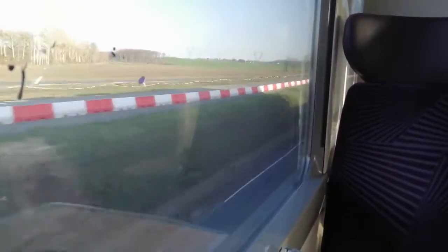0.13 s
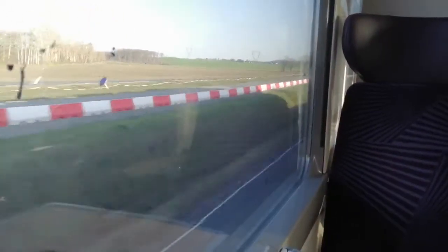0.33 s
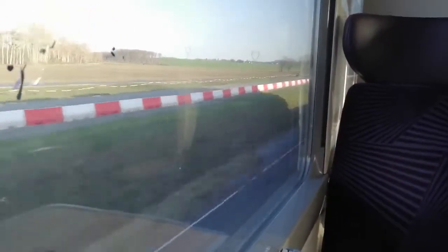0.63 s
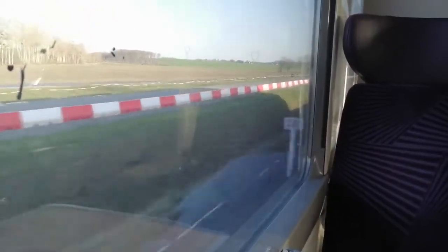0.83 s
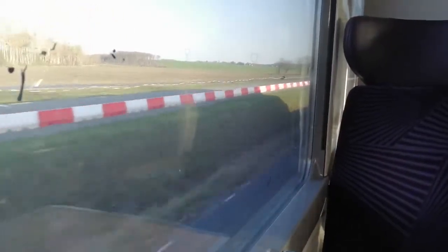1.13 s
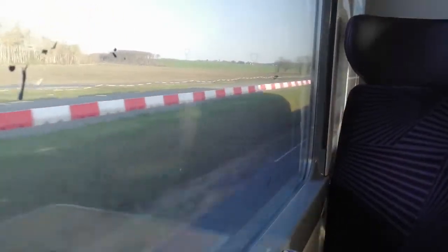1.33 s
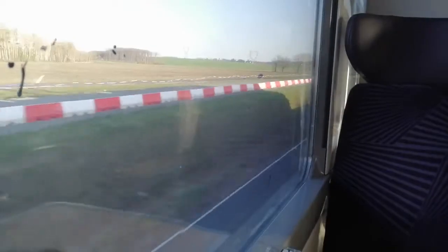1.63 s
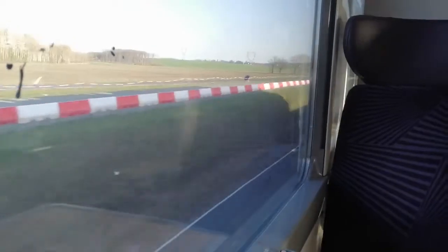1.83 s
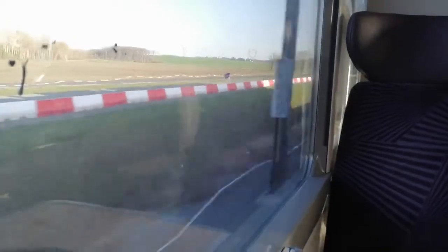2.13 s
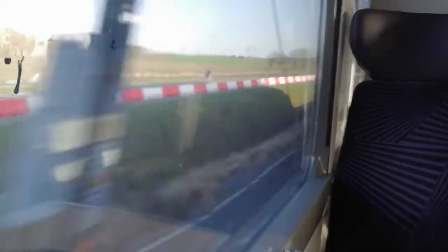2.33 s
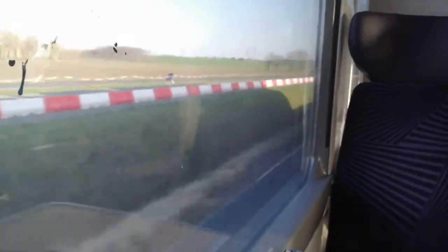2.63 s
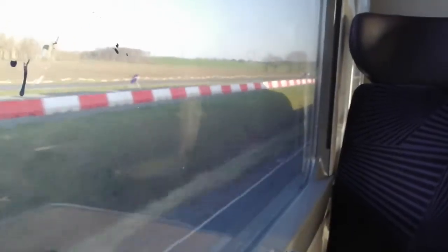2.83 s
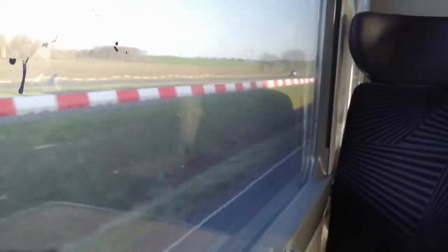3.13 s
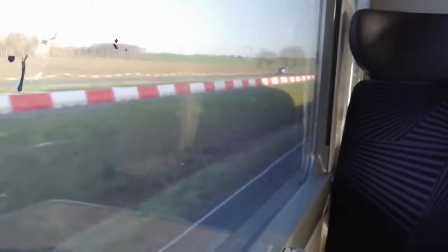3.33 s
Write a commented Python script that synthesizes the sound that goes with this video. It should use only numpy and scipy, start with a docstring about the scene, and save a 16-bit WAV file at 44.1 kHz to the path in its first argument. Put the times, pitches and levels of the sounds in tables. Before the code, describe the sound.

A passenger train runs at steady speed, heard from a window seat inside the coach. Deep floor rumble and a hollow, wavering body resonance continue throughout, with a low electrical hum, thin buzz and faint window hiss. Soft, dull track thuds swell at about 0.3 and 1.7 seconds. A short, faint air puff passes at 2.4, and a barely audible knock follows at 2.7. The treble is muted.

```python
"""Inside a passenger coach running at steady speed. Wheels rumble through the floor and ring the body:
coloured noise with randomly shaken resonances. The electrical supply hums and buzzes in wavering sines,
and air hisses along the window as patchy noise. Two soft thuds of swelling modes come up from the track,
a trackside mast sweeps past with a short puff of noise, and one faint knock sounds in the coach."""
import sys
import numpy as np
from scipy import signal
from scipy.fft import rfft, irfft
from scipy.io import wavfile
from scipy.ndimage import uniform_filter1d

SR = 44100
rng = np.random.default_rng(int(sys.argv[2]) if len(sys.argv) > 2 else 0)


def inscribe(sig):
    """Save sig as 16-bit PCM at rate SR to the path in sys.argv[1].

    A 1-D sig is mono; a 2-D sig holds one channel per row.
    Samples are clipped to [-1, 1] before scaling.
    """
    pcm = np.round(np.clip(np.atleast_2d(sig).T, -1, 1) * 32767)
    wavfile.write(sys.argv[1], SR, pcm.astype(np.int16))


N = 154350  # samples, 3.5 s


def amp(db):
    """Turns dB into a gain."""
    return 10 ** (np.asarray(db) / 20)


def unit(x):
    """Scales to rms 1."""
    return x / np.sqrt(np.mean(x ** 2) + 1e-20)


def read_spectrum(points, hz):
    """Joins spectrum points on a log-frequency axis."""
    point_hz, db = np.transpose(points)
    return np.interp(np.log(hz + 1), np.log(point_hz), db)


def curve(points):
    """Joins points in time by straight lines."""
    return np.interp(np.arange(N) / SR, *np.transpose(points))


def drift(rate_hz):
    """Slow random motion of rms 1: noise kept below about rate_hz, without its mean."""
    hz = np.fft.rfftfreq(N, 1 / SR)
    slow = np.exp(-(hz / rate_hz) ** 2) * (hz > 0)
    return unit(irfft(rfft(rng.standard_normal(N)) * slow, N))


def noise(spectrum, patchy_db, swell_db, size):
    """Coloured noise of rms 1 with drifting patches in time and pitch, and a swell shared by all pitches."""
    hz = np.fft.rfftfreq(N, 1 / SR)
    grid = signal.stft(rng.standard_normal(N), nperseg=size)[2]
    patches = uniform_filter1d(rng.standard_normal(grid.shape), size=7, axis=0)
    patches = unit(uniform_filter1d(patches, size=7, axis=1))
    white = signal.istft(grid * amp(patchy_db * patches), nperseg=size)[1][:N]
    coloured = irfft(rfft(white) * amp(read_spectrum(spectrum, hz)), N)
    return unit(coloured * amp(swell_db * drift(2.8)))


WANDER, WANDER_HZ = 0.00797, 3  # rms pitch wander as a fraction of the centre, and its rate
EVENNESS = 0.36  # 0 leaves the strength fully random, 1 makes it constant


def ringing(centre_hz, width_hz):
    """A resonance shaken at random but without rest, so its strength is fairly even; its pitch wanders. Rms 1."""
    hz = np.fft.fftfreq(N, 1 / SR)
    resonance = 1 / (1 + 1j * hz / width_hz * np.sqrt(2)) ** 2  # centred on 0 Hz, moved up below
    shake = np.fft.ifft(np.fft.fft(rng.standard_normal(N)) * resonance)
    even_shake = shake / abs(shake) ** EVENNESS
    turns = np.cumsum(centre_hz * (1 + WANDER * drift(WANDER_HZ))) / SR
    return unit((even_shake * np.exp(2j * np.pi * turns)).real)


def burst(start, rise, hold, t60):
    """Linear attack, hold and exponential release that falls 60 dB in t60 seconds."""
    t = np.arange(N) / SR - start
    release = np.exp(-np.log(1000) * np.maximum(t - rise - hold, 0) / t60)
    return np.clip(t / rise, 0, 1) * release


# Colour of the rolling rumble. Each row: frequency in Hz, relative level in dB per Hz.
RUMBLE_SPECTRUM = [(5, -27.5), (16, 3), (40, -2.5), (60, 2), (88, 0.5), (120, -3), (152, -2.5), (195, -7.5),
                   (225, -11.5), (300, -16.5), (420, -22), (540, -24.5), (690, -27.5), (980, -26),
                   (1300, -34), (1700, -43), (3500, -64)]
RUMBLE_DB, RUMBLE_PATCHY_DB, RUMBLE_SWELL_DB = -42, 0.32, 0.08
# Resonances of the floor. Each row: frequency in Hz, width in Hz, level in dB.
FLOOR_RESONANCES = [(37.1, 9, -56.5), (56, 10, -51), (153.6, 24, -53)]
# Resonances of wheels and coach body. Each row: frequency in Hz, width in Hz, level in dB.
BODY_RESONANCES = [(285.4, 5.5, -60.5), (335.2, 13.2, -54), (356.3, 28, -57.3), (384.7, 20, -58),
                   (444.2, 14, -65), (469, 12, -64.5), (492.6, 12, -68)]
# Level ride of the floor rumble. Each row: time in seconds, gain in dB.
FLOOR_RIDE = [(0, 1.5), (.13, .7), (.28, -0.5), (.55, 0.5), (.7, 0.4), (.93, -0.3), (1.38, 0.3), (1.55, 0),
              (1.95, 1), (2.1, -1), (2.23, 1.5), (2.44, -2), (2.68, -0.1), (2.96, 0.5), (3.06, 0.5),
              (3.23, 2), (3.37, -0.5), (3.5, 2)]
# Level ride of the body's ringing. Each row: time in seconds, gain in dB.
BODY_RIDE = [(0, -2.5), (.42, 1), (.75, 0.5), (.95, 0), (1.3, -1), (1.53, 0), (1.65, -0.5), (1.89, -2),
             (2.06, 1.5), (2.35, 0), (2.64, 3), (2.95, -1), (3.17, -0.5), (3.4, -5), (3.5, -6)]


def rolling():
    """Rough rails shake the floor and the resonances of the body, by changing amounts."""
    rumble = amp(RUMBLE_DB) * noise(RUMBLE_SPECTRUM, RUMBLE_PATCHY_DB, RUMBLE_SWELL_DB, size=1024)
    boom = sum(amp(db) * ringing(hz, width) for hz, width, db in FLOOR_RESONANCES)
    body = sum(amp(db) * ringing(hz, width) for hz, width, db in BODY_RESONANCES)
    return amp(curve(FLOOR_RIDE)) * (rumble + boom) + amp(curve(BODY_RIDE)) * body


# Harmonics of the electrical hum. Each row: multiple of HUM_HZ, rms level in dB.
HUM_LINES = [(1, -47), (6, -75.5), (8, -77), (9, -71.5), (10, -77.5), (12, -77.5), (13, -78.5), (20, -82),
             (21, -76), (22, -86.5), (23, -82), (24, -88.5), (25, -76.5), (26, -80), (30, -76.5),
             (31, -81.5), (32, -83.5), (34, -83.5)]
# Thin top of the buzz. Each row: multiple of HUM_HZ, rms level in dB.
BUZZ_LINES = [(40, -90.5), (63, -86.5), (72, -93)]
HUM_HZ = 100.06
HUM_WAVER_DB, HUM_WAVER_RAD, HUM_WAVER_HZ = 2.13, 0.044, 3.4  # rms in level, rms in phase, rate


def hum():
    """Harmonics of the supply, each wavering a little as the coach sways."""
    turns = HUM_HZ * np.arange(N) / SR
    out = np.zeros(N)
    for multiple, db in list(HUM_LINES) + list(BUZZ_LINES):
        phase = 2 * np.pi * (round(multiple) * turns + rng.random())
        phase = phase + HUM_WAVER_RAD * drift(HUM_WAVER_HZ)
        waver = amp(HUM_WAVER_DB * drift(HUM_WAVER_HZ))
        out += amp(db) * unit(waver * np.sin(phase))
    return out


# Colour of the air along the window. Each row: frequency in Hz, relative level in dB per Hz.
HISS_SPECTRUM = [(500, -12.5), (1400, -5), (1800, -3.5), (2600, 0), (3150, -3), (3700, -9), (4200, -10.5),
                 (4800, -7), (5350, -2.5), (6200, -5), (6850, -9), (7200, -14), (7550, -24)]
# Level ride of the hiss. Each row: time in seconds, gain in dB.
HISS_RIDE = [(0, -0.5), (.26, -1.2), (.43, 1.5), (.62, 0.2), (1.0, -.5), (1.52, 0.7), (1.86, -1),
             (1.97, -0.2), (2.14, -1), (2.21, -3), (2.36, -0.5), (2.52, -1.1), (3.5, -0.5)]
HISS_DB = -62.5
AIR_PATCHY_DB, AIR_SWELL_DB = 0.7, 0.3  # shared by hiss and puff


def hiss():
    """Air along the window: patchy noise whose level shifts a little and sags just before the mast."""
    air = noise(HISS_SPECTRUM, AIR_PATCHY_DB, AIR_SWELL_DB, size=512)
    return amp(HISS_DB + curve(HISS_RIDE)) * air


# Thuds from the track. Each row: start in seconds, level in dB, pitch ratio.
THUD_HITS = [(0.278, -44.5, 1.02), (1.712, -43, .985)]
# What a thud rings with. Each row: frequency in Hz, relative level in dB, swell time in seconds,
# pitch sag in Hz per second.
THUD_PARTIALS = [(111.6, -3.5, 0.043, 2.5), (178, -2, .028, 0.5), (250, -8.5, 0.018, 0),
                 (342.6, 0.5, .026, 0), (410, -11, 0.02, 2), (594, -13, 0.013, 901), (788, -22, 0.011, 400),
                 (1124, -23, .011, 1501)]
THUD_HOLD_S, THUD_T60_S = 0.017, .17
THUD_ROUGH, THUD_WIDTH_HZ = 0.47, 55  # rms of the shudder beside a tone of rms 1, and its width


def thuds():
    """The wheels cross an uneven spot: the upper modes knock first and sag, the low ones swell after them."""
    out = np.zeros(N)
    for hz, db, swell, sag in THUD_PARTIALS:
        shudder = THUD_ROUGH * ringing(hz, THUD_WIDTH_HZ)
        for start, level_db, pitch in THUD_HITS:
            age = np.clip(np.arange(N) / SR - start, 0, THUD_T60_S)  # the sag stops after this time
            turns = np.cumsum(hz * pitch - sag * age) / SR + rng.random()
            tone = unit(np.sin(2 * np.pi * turns))
            envelope = burst(start, swell, THUD_HOLD_S, THUD_T60_S)
            out += amp(level_db + db) * envelope * (tone + shudder)
    return out


# Colour of the air pushed back by a passing mast. Each row: frequency in Hz, relative level in dB per Hz.
PUFF_SPECTRUM = [(300, 4.5), (700, 4), (1700, -5.5), (2600, 6), (3500, -2), (4100, -11), (5300, -1.5),
                 (6600, 0), (7100, -6.5), (7500, -21)]
PUFF_S, PUFF_DB = 2.372, -55
PUFF_RISE_S, PUFF_HOLD_S, PUFF_T60_S = 0.013, .012, .26


def puff():
    """A passing mast pushes air back at the window: one short burst of noise."""
    air = noise(PUFF_SPECTRUM, AIR_PATCHY_DB, AIR_SWELL_DB, size=256)
    return amp(PUFF_DB) * air * burst(PUFF_S, PUFF_RISE_S, PUFF_HOLD_S, PUFF_T60_S)


KNOCK_S, KNOCK_DB, KNOCK_HZ, KNOCK_WIDTH_HZ = 2.705, -60, 946, 260
KNOCK_RISE_S, KNOCK_HOLD_S, KNOCK_T60_S = 0.0062, .018, 0.13


def knock():
    """One faint, dull knock, perhaps a panel shifting: a short burst of one broad resonance."""
    envelope = burst(KNOCK_S, KNOCK_RISE_S, KNOCK_HOLD_S, KNOCK_T60_S)
    return amp(KNOCK_DB) * envelope * ringing(KNOCK_HZ, KNOCK_WIDTH_HZ)


def scene():
    """All that is heard at the window seat, as one channel."""
    return (rolling() + hum() + hiss() + thuds() + puff() + knock())[None]


EDGE_HZ = 7560


def record(dry):
    """A steep low-pass ends the treble at EDGE_HZ."""
    low_pass = signal.firwin(401, EDGE_HZ, window=("kaiser", 8), fs=SR)
    return signal.oaconvolve(dry, low_pass[None], "same")


dry = scene()
out = record(dry)
inscribe(out)
```